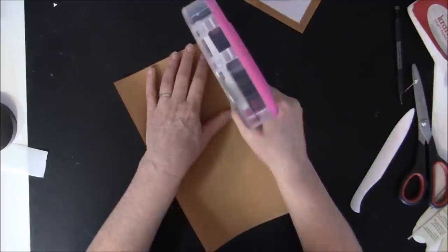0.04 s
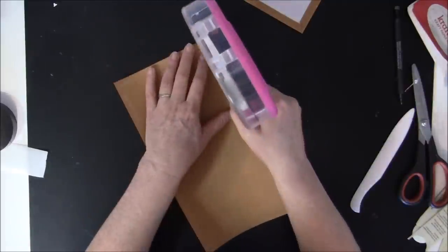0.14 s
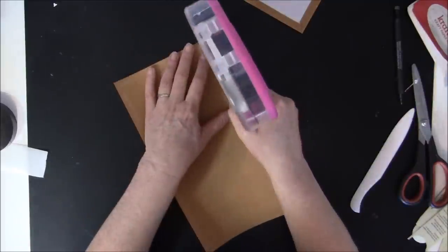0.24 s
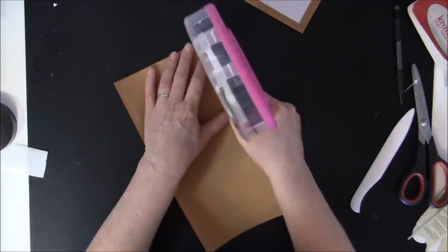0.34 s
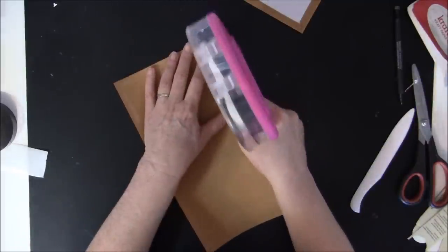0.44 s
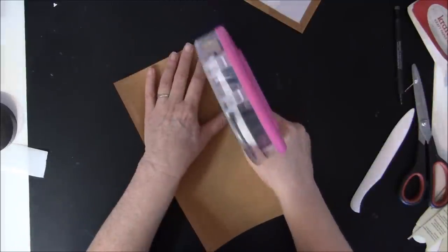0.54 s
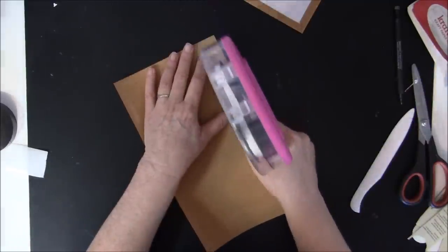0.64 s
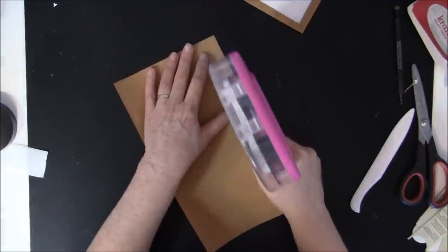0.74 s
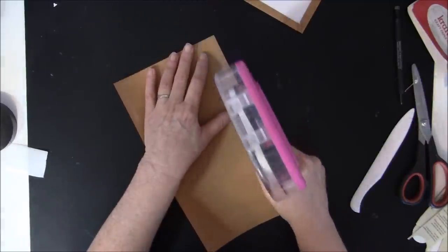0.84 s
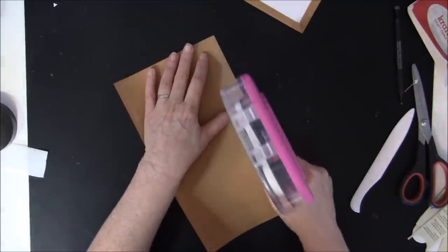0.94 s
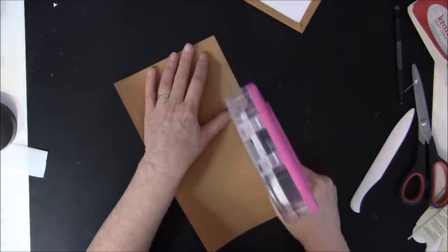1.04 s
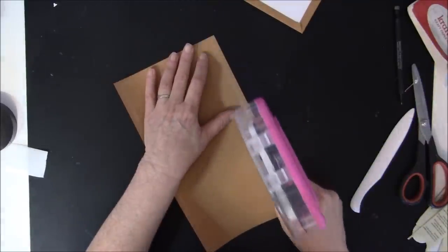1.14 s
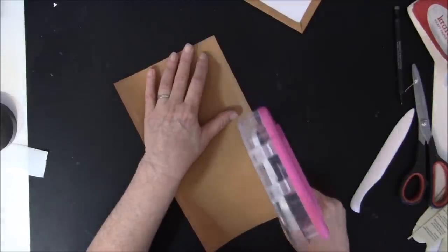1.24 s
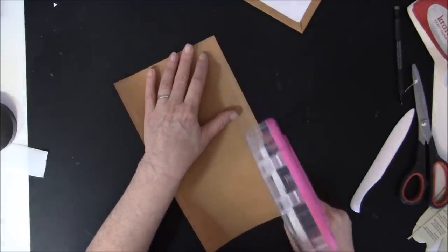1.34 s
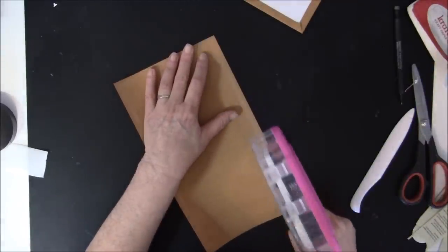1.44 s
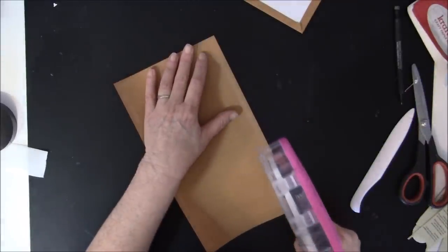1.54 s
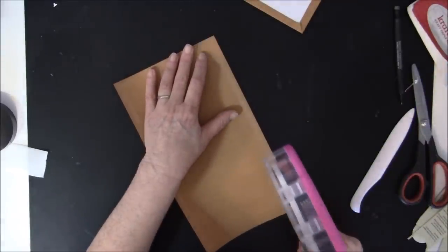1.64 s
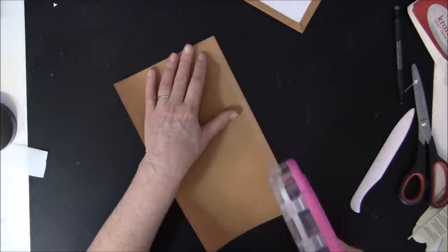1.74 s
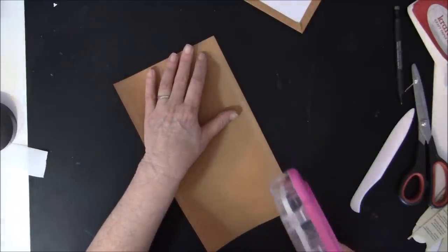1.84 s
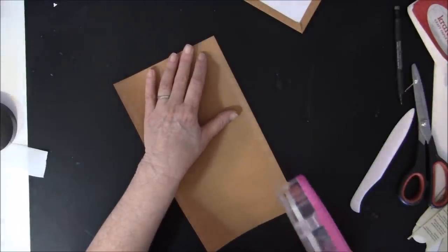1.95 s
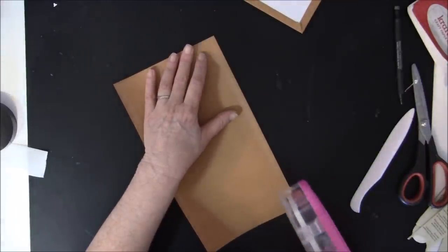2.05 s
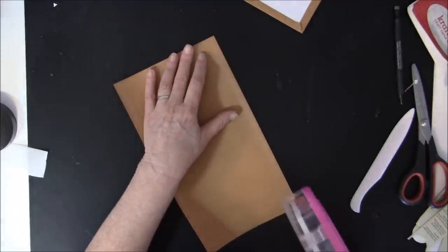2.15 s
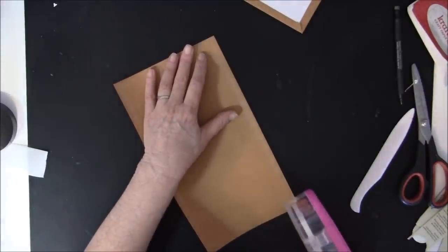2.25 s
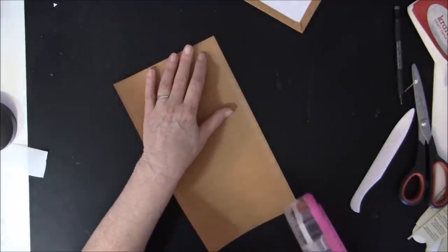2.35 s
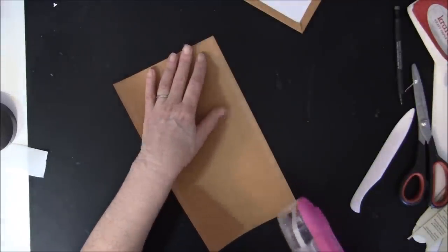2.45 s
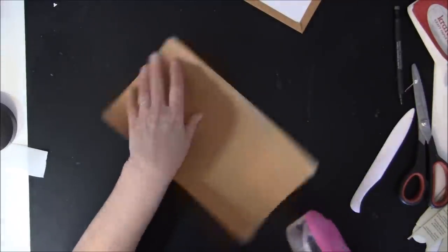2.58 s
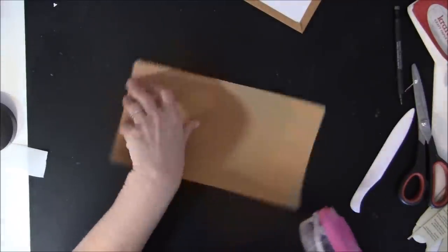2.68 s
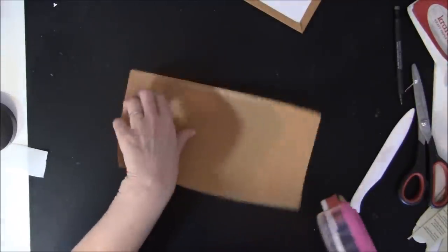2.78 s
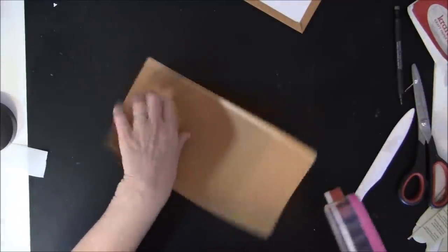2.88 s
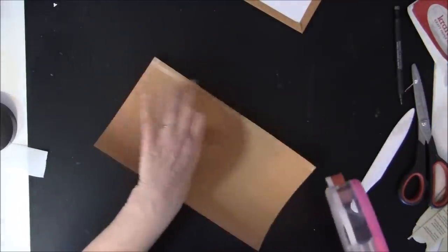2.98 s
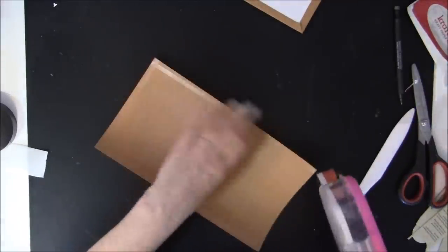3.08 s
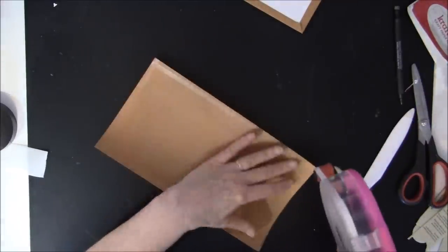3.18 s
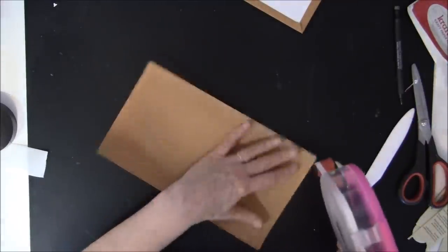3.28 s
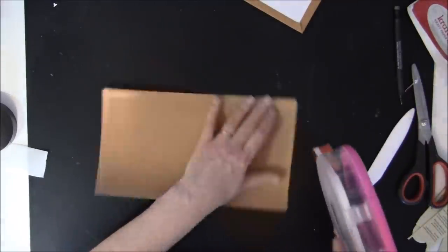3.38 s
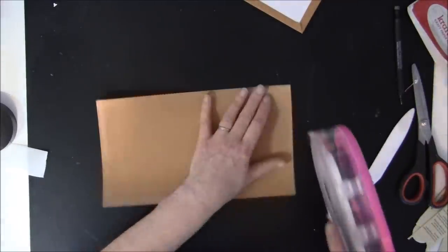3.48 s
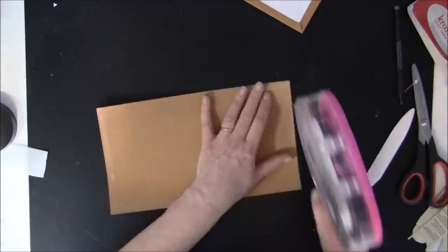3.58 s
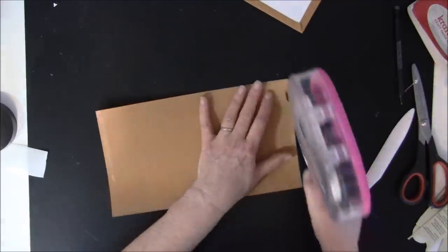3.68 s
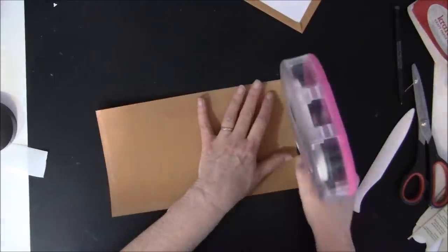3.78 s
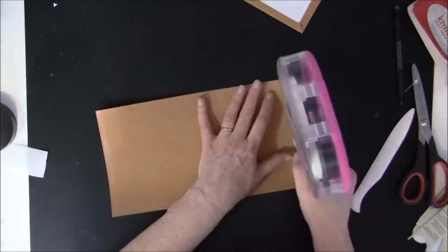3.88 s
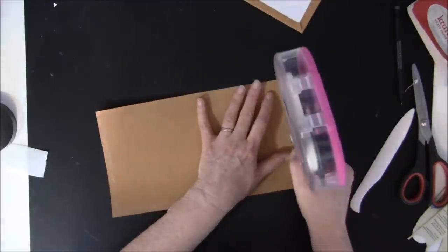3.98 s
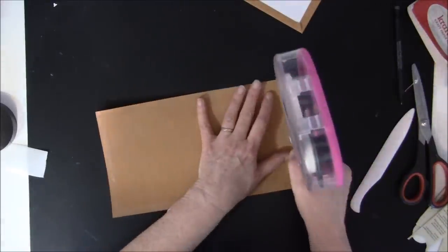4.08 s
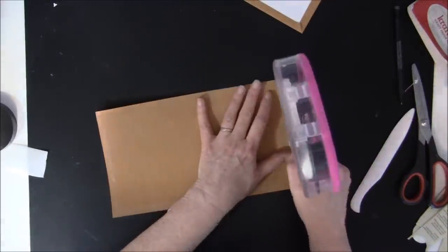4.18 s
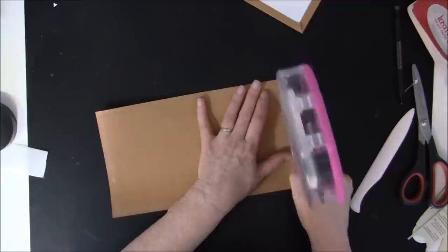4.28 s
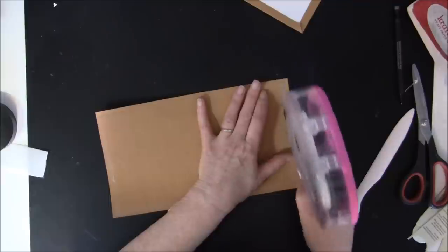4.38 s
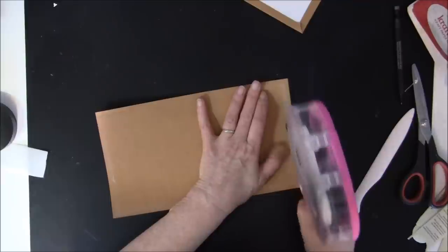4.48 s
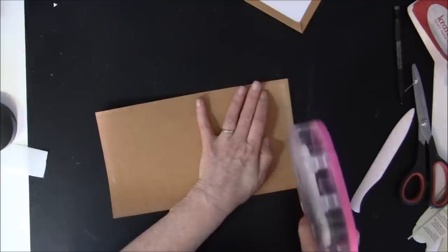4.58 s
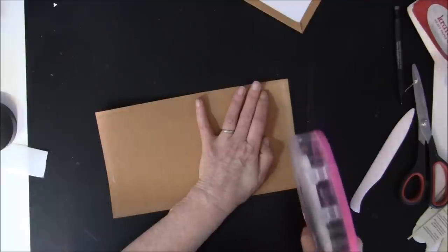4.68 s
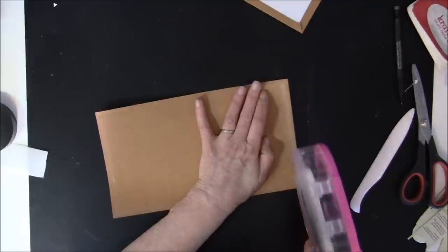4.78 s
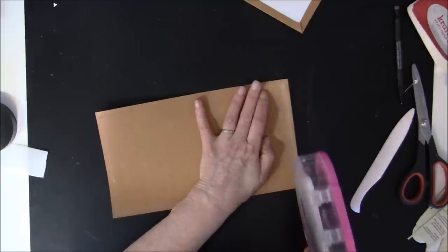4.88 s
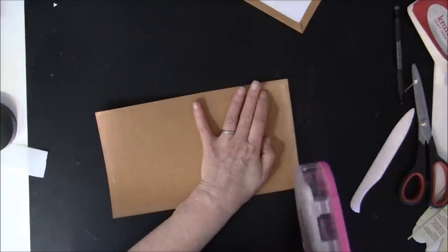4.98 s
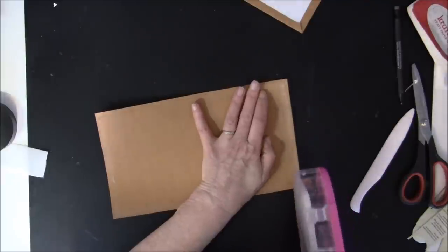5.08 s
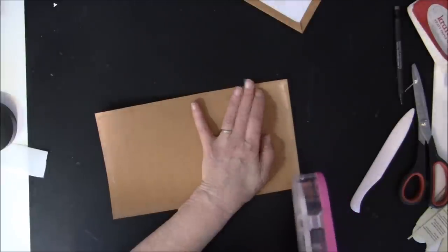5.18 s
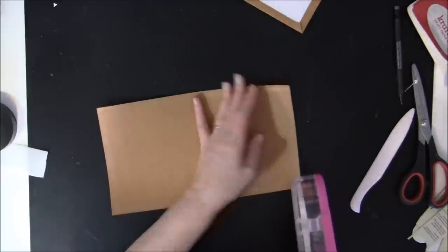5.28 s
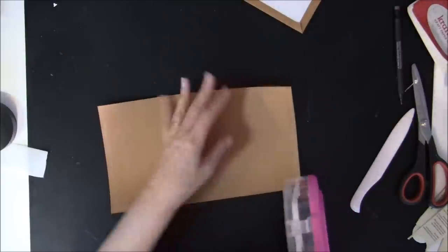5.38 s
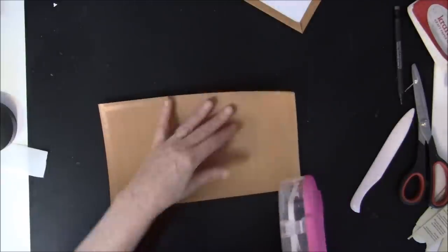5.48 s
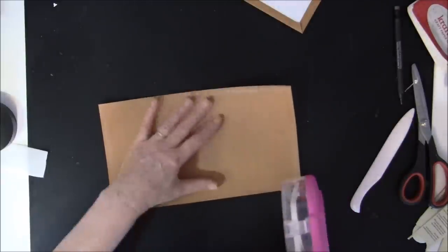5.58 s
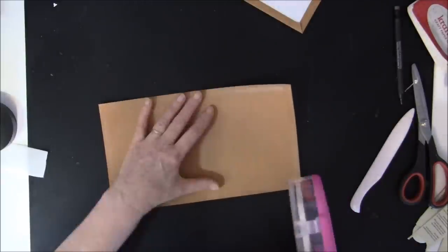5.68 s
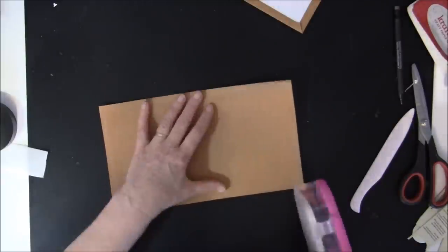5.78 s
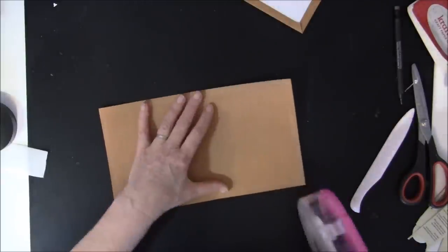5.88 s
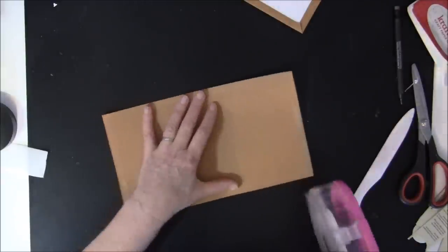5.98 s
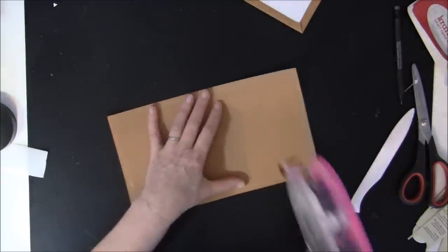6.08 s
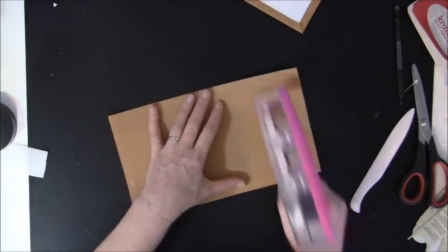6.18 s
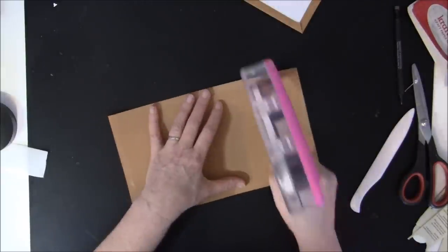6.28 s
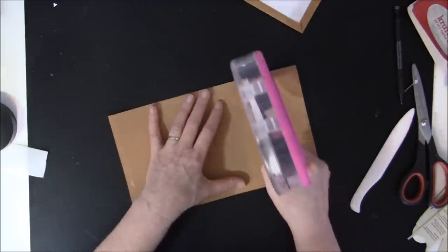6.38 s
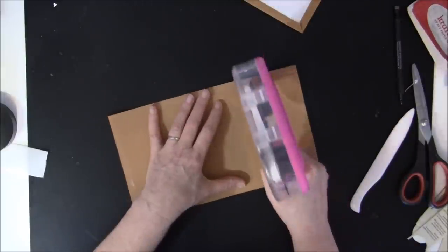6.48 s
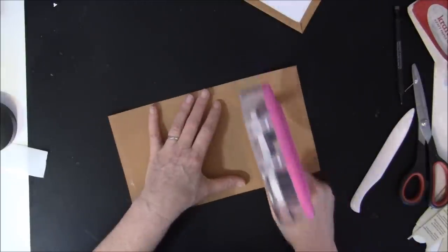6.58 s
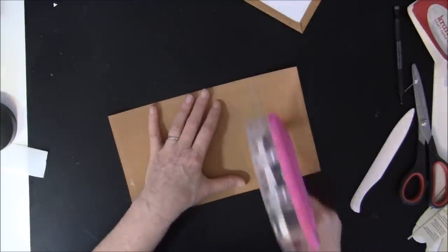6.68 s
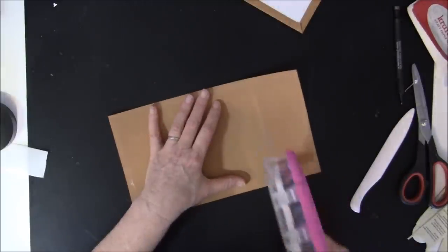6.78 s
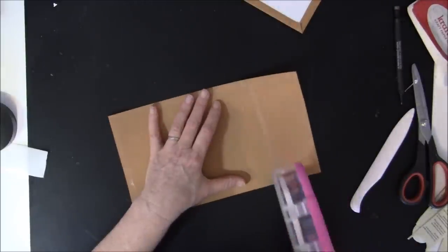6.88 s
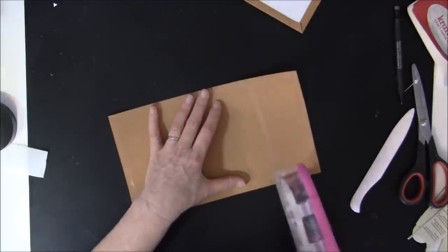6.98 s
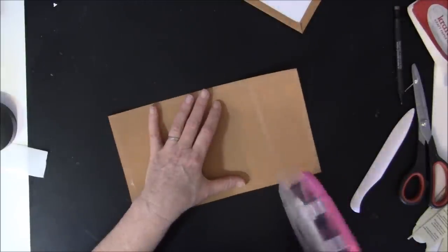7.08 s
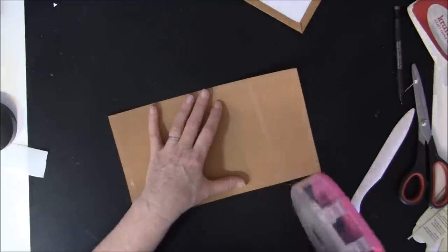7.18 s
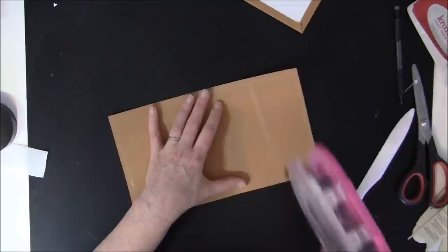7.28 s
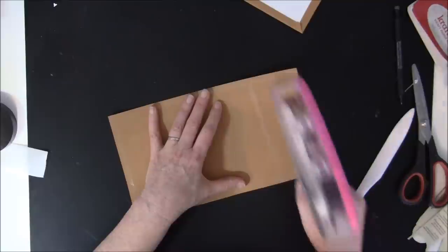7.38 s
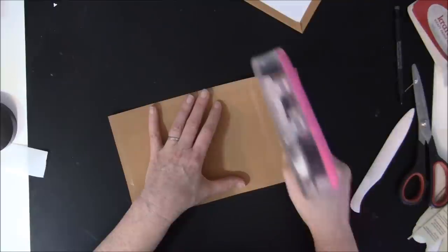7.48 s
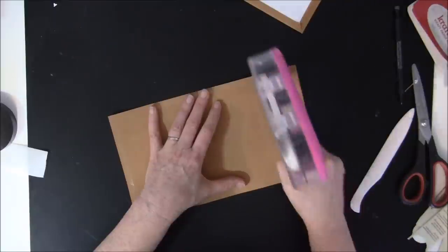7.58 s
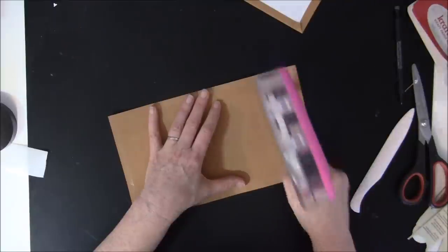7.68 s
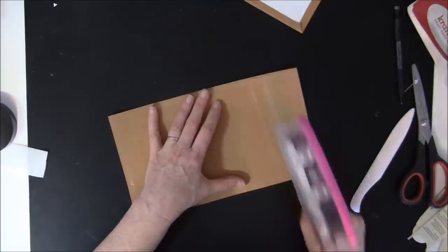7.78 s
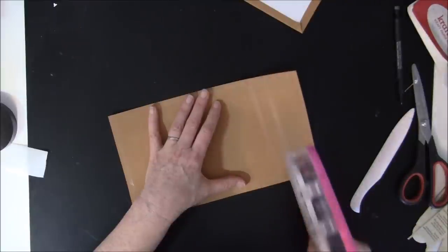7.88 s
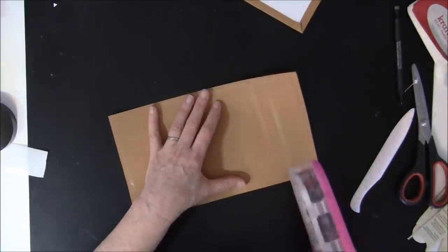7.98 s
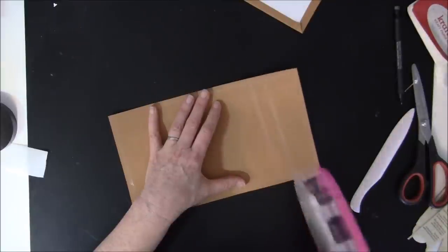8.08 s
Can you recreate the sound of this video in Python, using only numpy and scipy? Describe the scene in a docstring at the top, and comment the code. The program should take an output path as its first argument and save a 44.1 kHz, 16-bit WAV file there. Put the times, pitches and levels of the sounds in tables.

```python
"""At a craft table in a small room, a tape runner squeaks awake, then rolls a long, slow stroke over cardstock.
Its gears chatter in the hollow case while the tape rasps and crackles off; then the case clacks and a hand
slides and turns the card. Clacks, thuds and a squeak lead into a second stroke; more sliding follows.
Two short, loud strokes end it, the first with a burst of high squeaks, both set about with clacks and thuds.
Impacts and noise excite filters, squeaks and thuds are sines; air noise and a faint hum run throughout."""
import sys
import numpy as np
from scipy import signal
from scipy.fft import rfft, irfft
from scipy.io import wavfile
from scipy.ndimage import uniform_filter1d

SR = 44100
rng = np.random.default_rng(int(sys.argv[2]) if len(sys.argv) > 2 else 0)


def generate_wav(signal):
    """Clip the signal to [-1, 1] and save it as 16-bit WAV at the path in sys.argv[1]."""
    frames = np.transpose(np.atleast_2d(signal))
    scaled = np.clip(frames, -1, 1) * 32767
    pcm = np.round(scaled).astype(np.int16)
    wavfile.write(sys.argv[1], SR, pcm)


N = 358974
TIME = np.arange(N) / SR
BINS = np.fft.rfftfreq(4096, 1 / SR)  # filter design frequencies, Hz


# strokes of the runner: (start [s], fastest [s], end [s], relative gear chatter [dB], relative tape peel [dB],
# how much quieter at the ends [dB])
STROKES = [(0.318, 0.756, 2.18, -32.5, -50.5, 11), (4.2, 4.39, 5.106, -30.5, -45, 18),
           (6.5, 6.72, 6.92, -22, -37.5, 12), (7.607, 7.763, 8.08, -18.5, -32.5, 28)]


def rolling():
    """Pulling the runner turns its gears and strips its tape; chatter and peel surge with one uneven drag."""
    strokes = [swell(start, peak, end, ease_db) for start, peak, end, _, _, ease_db in STROKES]
    chatter_db, peel_db = np.transpose(STROKES)[3:5]
    drag = np.tanh(wander(rate_hz=5.7))
    return rolling_case(strokes, chatter_db, drag) + peeling_tape(strokes, peel_db, drag)


# broad response of the rolling case: (frequency [Hz], level [dB])
CASE_BROAD = [(40, -48), (150, -16), (400, -40), (1000, -19), (2500, -26), (3600, -24.5), (5000, -40),
              (16000, -48)]
# resonances of the rolling case: (frequency [Hz], width [Hz], level [dB])
CASE_MODES = [(346, 67, -15), (557, 42, 4), (643, 66, 3), (900, 31, -11.5), (1229, 57, 0), (1850, 180, -12),
              (2317, 33, -10.5), (2900, 78, -12.5)]
# resonances behind the small knocks of gear play: (frequency [Hz], width [Hz], level [dB])
KNOCK_MODES = [(580, 29, 0.5), (650, 42, -1.5)]
# spectrum of the roller skidding on the card: (frequency [Hz], level [dB])
SCRAPE = [(500, -27), (850, 1), (1500, 0), (3600, -9), (4700, -11.5), (6500, -30.5)]
TEETH_PER_S, TEETH_DB = 90, -18.5  # sharp ticks of the running teeth, within the chatter
SCRAPE_DB = -12.5  # within the chatter, at its loudest
KNOCKS_PER_S, KNOCKS_DB = 60, -4.5  # re the chatter level of a slow stroke
KNOCK_LIMIT_DB = -37  # the play is small, so knocks stop growing above this chatter level


def rolling_case(strokes, chatter_db, drag):
    """Meshing gears, sharp teeth and loose play ring the hollow case as the roller scrapes the card."""
    turning = level(strokes, chatter_db)
    meshing = slips(per_s=1300, spread_db=0.5) * gain_of(1.0 * drag)
    gears = flexed(colour(meshing, response(CASE_BROAD, CASE_MODES)))
    teeth = colour(beats(TEETH_PER_S, uneven=0.5, spread_db=9.0), struck_case())
    play = beats(KNOCKS_PER_S, uneven=0.6, spread_db=6)
    knocks = flexed(colour(play, response([(1000, -56)], KNOCK_MODES)))
    scrape = colour(slips(per_s=980, spread_db=4.5), response(SCRAPE))
    skid = turning / turning.max()  # the roller skids more the faster it is pulled
    chatter = gain_of(-2) * evened(gears) + gain_of(TEETH_DB) * evened(teeth)
    chatter += gain_of(SCRAPE_DB) * evened(scrape) * np.sqrt(skid)
    knocking = level(strokes, np.minimum(chatter_db, KNOCK_LIMIT_DB))
    return chatter * turning + gain_of(KNOCKS_DB) * evened(knocks) * knocking


# spectrum of adhesive letting go: (frequency [Hz], level [dB])
PEEL = [(2000, -39), (4000, -4.5), (6000, -8), (7500, -5.5), (9500, -2.5), (11500, -7.5), (13500, -14),
        (16000, -27)]
# spectrum of tape dragging over its guide: (frequency [Hz], level [dB])
RASP = [(1400, -22), (2100, -8), (2500, -4), (3000, -4), (3700, -2), (4400, -36), (8000, -55)]
SNAPS_PER_S, SNAPS_DB = 20, -17  # sparse snaps of adhesive, within the peel
RASP_DB = -51.5  # the same in every stroke


def peeling_tape(strokes, peel_db, drag):
    """Adhesive lets go in a dense crackle and sparse snaps while the tape rasps over its guide."""
    surge = gain_of(0.61 * drag + 3.5 * wander(rate_hz=31))
    crackle = colour(slips(per_s=3100, spread_db=-3.0) * surge, response(PEEL))
    snaps = colour(beats(SNAPS_PER_S, uneven=0.7, spread_db=0.0), response(PEEL))
    rasp = colour(slips(per_s=2500, spread_db=4.0), response(RASP))
    peel = gain_of(-5.5) * evened(crackle) + gain_of(SNAPS_DB) * evened(snaps)
    return peel * level(strokes, peel_db) + gain_of(RASP_DB) * evened(rasp) * np.sqrt(sum(strokes))


# dull knocks of the spool lurching in its case: (time [s], level [dB])
KNOCKS = [(0.554,-25), (0.645,-22), (0.755,-18.5), (0.917,-27.5), (1.421,-20.5), (1.781,-23), (2.228,-32),
          (4.338,-20.5), (4.42,-22.5), (4.547,-19), (4.596,-22.5), (4.653,-24), (4.807,-26), (6.765,-18.5),
          (7.76,-17), (7.842,-16.5)]
KNOCK_HZ, KNOCK_SCATTER, KNOCK_RISE_S = 606.7, 0.06, 0.0035  # each knock lands on another spot of the wall
KNOCK_OCTAVE_DB = -11.5  # the wall's second mode


def lurches():
    """The spool shifts in its play and knocks the hollow case: a short, soft, pitched bump."""
    out, t = np.zeros(N), TIME[:SR // 10]
    bump = (t / KNOCK_RISE_S * np.exp(1 - t / KNOCK_RISE_S)) ** 1.74
    spots = rng.uniform(-0.97, 1, len(KNOCKS))
    for (s, db), spot in zip(KNOCKS, spots):
        phase = 2 * np.pi * KNOCK_HZ * (1 + KNOCK_SCATTER * spot) * t
        tone = np.sin(phase) + gain_of(KNOCK_OCTAVE_DB) * np.sin(2 * phase)
        add(out, s, gain_of(db) * bump * tone)
    return out


# spool squeaks: (start [s], loudest [s], end [s], first pitch [Hz], last pitch [Hz], fundamental [dB],
# octave before the wall colours it [dB])
SQUEAKS = [(0.078, 0.088, 0.116, 740, 660, -31, -34), (0.275, 0.314, 0.348, 920, 1345, -29, -38),
           (4.16, 4.22, 4.248, 950, 1360, -26, -31.5), (6.467, 6.494, 6.503, 1160, 1350, -20.5, -37),
           (6.499, 6.508, 6.517, 2850, 2990, -14, -41), (6.509, 6.521, 6.533, 2950, 3150, -22, -25),
           (6.522, 6.536, 6.565, 3050, 3100, -33, -48)]
# how the case wall favours overtones gliding through its resonances: (frequency [Hz], level [dB])
SQUEAK_WALL = [(1950, -4), (2200, -3), (2520, 4.5), (2750, 2), (3500, 1), (4600, -11.5), (12000, -28)]
GLIDE_POWER = 2.3  # how soon the pitch settles
SQUEAK_EASE_DB, OVERTONE_EASE_DB = 19, 11  # how much quieter the ends are
OVERTONE_FALL_DB = 6  # per overtone above the octave
OVERTONE_LEAD = 0.65  # overtones peak at this share of the rise, while the slip is still harsh
SHUDDER_DB = 4  # greatest swing of the fundamental: the slip is uneven in strength


def squeaks():
    """The spool sticks and slips, its pitch gliding to rest; overtones flare as they cross wall resonances."""
    out, jitter = np.zeros(N), wander(rate_hz=410)
    shudder = gain_of(SHUDDER_DB * np.tanh(wander(rate_hz=99)))
    flutter = [gain_of(3.4 * wander(rate_hz=100)) for _ in range(5)]  # one per overtone
    for start, peak, end, first_hz, last_hz, first_db, octave_db in SQUEAKS:
        at = np.flatnonzero((TIME > start) & (TIME < end))
        hz = last_hz + (first_hz - last_hz) * np.linspace(1, 0, len(at)) ** GLIDE_POWER
        phase = 2 * np.pi * np.cumsum(hz * (1 + 0.032 * jitter[at])) / SR
        fundamental = gain_of(first_db) * swell(start, peak, end, SQUEAK_EASE_DB)[at] * shudder[at]
        tone = fundamental * np.sin(phase)
        overtone_peak = start + OVERTONE_LEAD * (peak - start)
        overtones = swell(start, overtone_peak, end, OVERTONE_EASE_DB)[at]
        for k, waver in enumerate(flutter, 2):
            wall = gain_of(octave_db - OVERTONE_FALL_DB * (k - 2) + read(SQUEAK_WALL, k * hz))
            tone += wall * overtones * waver[at] * np.sin(k * phase) * (k * hz < EDGE_HZ)
        add(out, start, np.sqrt(2) * tone * signal.windows.tukey(len(at), .1))
    return out


# broad response of the struck case: (frequency [Hz], level [dB])
CLACK_BROAD = [(60, -28), (230, -18), (390, -12), (1000, -7), (3000, -13.5), (4300, -16.5), (5500, -23),
               (9500, -25.5), (16000, -47.5)]
# resonances of the struck case: (frequency [Hz], width [Hz], level [dB])
CLACK_MODES = [(391, 48, -12.5), (535, 60, 6), (711, 26, 4.5), (1250, 134, -1), (1560, 160, -15),
               (1830, 200, -5), (2304, 60, -6.5), (2870, 490, -10)]


def struck_case():
    """Gain per bin of the plastic case when struck: wall resonances over a broad response."""
    return response(CLACK_BROAD, CLACK_MODES)


# clacks of the plastic case: (time [s], relative blow [dB], hollow body weight [dB], sharp edge weight [dB],
# rattle decay by 60 dB [s], ring of the struck wall [Hz], wall ring re case ring [dB])
CLACKS = [(2.395,-8.5,-2,-17,0.15,1567,-6), (2.526,-18.5,-11,-39,0.11,1170,-1.5),
          (2.761,-15,0,-5,0.05,387,-4), (3.654,-10.5,-3.5,-9,0.085,1938,-1),
          (4.018,-13,-0.5,-18.5,0.11,576,-8.5), (4.139,-16.5,1.5,-21,0.089,302,-4.5),
          (5.805,-13.5,-1.5,-13,0.13,325,-14), (5.912,-17,4.5,-40,0.11,1065,-10),
          (6.093,-10.5,-34,-21,0.12,2410,-14), (6.153,-18.5,-6,-29,0.065,1230,-5),
          (6.433,-5,-14,-15.5,0.13,1870,-23), (6.442,-13,11,-26,0.049,469,-13),
          (6.461,-7.5,-2,-34,0.16,1880,-7.5), (6.636,-10.5,-5,-22,0.12,302,-15),
          (7.301,-20.5,1,-23,0.32,1143,-4), (7.365,-20,-0.5,-30,0.079,1327,-5.5),
          (7.587,-8,-7.5,-15.5,0.12,2760,-11), (7.61,-9.5,0,-43,0.12,1700,-14),
          (7.976,-10,-1,-18,0.21,1260,-17)]
WALL_T60, WALL_RISE_S, WALL_PAIR = 0.059, 0.00064, 1.2  # decay s, rise s, upper tone's pitch re lower


def clacks():
    """Blows ring the case with their own mix of body and edge; the struck wall adds a close pair of tones."""
    out, t = np.zeros(N), TIME[:SR // 4] - TIME[SR // 100]  # contact comes 10 ms in
    case = struck_case()
    body, edge = 1 / (1 + (BINS / 900) ** 4), 1 - 1 / (1 + (BINS / 4300) ** 6)
    low, mid, high = (case * band / np.linalg.norm(case * band) for band in (body, 1 - body - edge, edge))
    after = np.maximum(t, 0)
    dying = (1 - np.exp(-after / WALL_RISE_S)) * np.exp(-np.log(1000) * after / WALL_T60)
    for s, db, body_db, edge_db, rattle_s, wall_hz, wall_db in CLACKS:
        # long rattles begin with a brief noise swell before the contact
        lead_in_db = np.interp(rattle_s, [.085, .12], [-20, 2])
        blow = contact(t, rattle_s, rattle=2.3, lead_in_db=lead_in_db)
        ring = colour(blow, gain_of(body_db) * low + 0.72 * mid + gain_of(edge_db) * high)
        pair = sum(np.sin(2 * np.pi * (hz * t + rng.random())) for hz in (wall_hz, WALL_PAIR * wall_hz))
        add(out, s + t[0], gain_of(db) * (evened(ring) + gain_of(wall_db) * evened(dying * pair)))
    return gain_of(-20.5) * out


# small clicks of the gear teeth catching: (time [s], relative level [dB])
CATCHES = [(0.083,-26.5), (0.237,-30.5), (0.644,-23), (0.799,-20.5), (1.503,-18.5), (2.24,-33),
           (2.352,-27.5), (4.711,-19), (5.727,-22), (5.745,-19.5), (5.773,-22), (6.695,-16), (6.809,-16.5),
           (6.858,-14.5), (6.945,-18.5), (7.031,-25), (7.322,-22.5), (7.724,-20), (7.818,-10.5)]
CATCH_RATTLE_S, CATCH_EDGE_DB = 0.071, -3.5  # decay of a tooth's chatter; its treble re that of the struck case


def catches():
    """A gear tooth catches and lets go with a brief click in the case."""
    out, t = np.zeros(N), TIME[:SR // 4]
    treble = (BINS / 4300) ** 6 / (1 + (BINS / 4300) ** 6)
    case = struck_case() * gain_of(CATCH_EDGE_DB * treble)
    for s, db in CATCHES:
        click = colour(contact(t, CATCH_RATTLE_S, rattle=3.3), case)
        add(out, s, gain_of(db) * evened(click))
    return gain_of(-20.5) * out


# thuds on the table: (time [s], relative level [dB])
THUDS = [(0.09, -44), (4.02, -24), (4.14, -23.5), (4.559, -31.5), (4.657, -39), (5.565, -37), (5.8, -34.5),
         (6.434, -14.5), (6.466, -21), (6.643, -28), (7.59, -18.5)]
# modes of the table top: (frequency [Hz], level [dB], decay by 60 dB [s])
TABLE_MODES = [(73.3, -6.5, 0.26), (106.5, 0.5, 0.081), (171.3, -6.5, 0.17), (192, -5, 0.08)]


def thuds():
    """Pressing the runner down sets the table top swinging; it radiates little below its lowest mode."""
    out, t = np.zeros(N), TIME[:SR // 2]
    swing = sum(gain_of(db - 60 * t / t60) * np.sin(2 * np.pi * hz * t) for hz, db, t60 in TABLE_MODES)
    soft_onset = 1 - np.exp(-t / 0.0036)
    for s, db in THUDS:
        add(out, s, gain_of(db) * swing * soft_onset)
    return gain_of(5) * signal.sosfilt(signal.butter(4, 58, "high", fs=SR, output="sos"), out)


# swishes of card and hand: (start [s], peak [s], end [s], relative hiss [dB], relative dull rub [dB])
SLIDES = [(2.434, 2.505, 2.63, -31.5, -36), (2.54, 2.63, 2.77, -23, -35.5),
          (2.663, 2.692, 2.73, -19.5, -33), (2.7, 2.727, 2.88, -39, -31), (2.795, 2.823, 2.89, -25, -34),
          (2.815, 2.894, 2.936, -19.5, -29), (3.015, 3.056, 3.08, -39, -39), (3.189, 3.39, 3.602, -26, -34),
          (3.316, 3.355, 3.472, -15, -58), (4.423, 4.528, 4.47, -34, -49), (5.25, 5.277, 5.35, -39, -38.5),
          (5.327, 5.404, 5.5, -32.5, -40.5), (5.424, 5.507, 5.8, -43.5, -41.5),
          (5.566, 5.648, 5.64, -30.5, -55), (5.705, 5.785, 5.85, -43.5, -43),
          (5.91, 6.009, 6.19, -32.5, -36)]
# spectrum of the fine hiss of paper fibres: (frequency [Hz], level [dB])
HISS = [(900, -40), (2000, -20), (3000, -6.5), (4300, -3.5), (9300, 2.5), (12500, -5), (15500, -22)]
# spectrum of the duller rub of the sheet: (frequency [Hz], level [dB])
RUB = [(80, -26), (300, -12), (600, -13), (900, -3), (1200, -0.5), (1900, 3.5), (2800, 3.5), (4500, 0.5),
       (9000, -55)]
SLIDE_EASE_DB = 26.5  # how much quieter a swish is at its ends


def sliding():
    """Paper fibres catch on the mat and on skin: a fine hiss and the duller rub of the sheet."""
    swishes = [swell(start, peak, end, SLIDE_EASE_DB) for start, peak, end, _, _ in SLIDES]
    hissing, rubbing = (level(swishes, column) for column in np.transpose(SLIDES)[3:])
    grip = gain_of(1.0 * wander(rate_hz=120))
    hiss = evened(colour(slips(per_s=13000, spread_db=1.0), response(HISS)))
    rub = evened(colour(slips(per_s=3800, spread_db=2.0), response(RUB)))
    return grip * (gain_of(-2.5) * hiss * hissing + gain_of(2.0) * rub * rubbing)


# light ticks of card and tape: (time [s], peak level [dB])
TICKS = [(0.694,-27), (1.077,-25), (1.188,-31), (1.284,-32.5), (2.457,-9.5), (2.738,-8.5), (2.938,-15.5),
         (2.984,-33), (3.224,-18), (5.204,-17), (5.226,-18), (5.536,-15), (5.557,-16.5), (8.036,-19.5)]


def ticks():
    """Light ticks: adhesive snaps as tape pulls, fingertips and card edges flick."""
    out, t = np.zeros(N), TIME[:SR // 10]
    card = response(HISS) + response(RUB)
    for s, db in TICKS:
        tick = colour(contact(t, rattle_s=0.045, rattle=1.63), card)
        add(out, s, gain_of(db) * tick / abs(tick).max())
    return out


# spectrum of the room tone: (frequency [Hz], level [dB])
QUIET = [(25,-23), (70,-1), (100,-13), (130,-4), (280,1), (590,1.5), (1000,-2.5), (4000,-14.5),
         (15500,-28.5)]
# room tone, unlike part re shared part: (frequency [Hz], level [dB])
AIR_SIDE = [(60, -8), (110, -4), (250, 5.5), (500, 5), (8000, -3)]
AIR_DB = -47  # shared part, rms
HUM_HZ, HUM_DB = 99.6, -57.5  # rms


def room_tone():
    """Steady air noise, wide in the middle range and centred in the bass, and a faint mains hum."""
    shared, unlike = (evened(colour(rng.standard_normal(N), response(QUIET))) for _ in range(2))
    unlike = colour(unlike, response(AIR_SIDE))
    air = gain_of(AIR_DB) * np.array([shared + unlike, shared - unlike])
    return air + gain_of(HUM_DB) * np.sqrt(2) * np.sin(2 * np.pi * HUM_HZ * TIME)


# shared reflections re direct sound: (frequency [Hz], level [dB])
ROOM_DB = [(70, -56), (150, -22.5), (350, -3), (2000, -11), (9000, -10)]
# reflections, unlike part re shared part: (frequency [Hz], level [dB])
ROOM_SIDE = [(600, -13), (2000, -4), (11000, 3.5)]
ROOM_T60 = 0.16  # s


def room(x):
    """Adds a short scatter of reflections, alike at both ports in the bass and unlike in the treble."""
    t = TIME[:SR // 2]
    arrivals = rng.choice([-1, 1], (2, len(t))) * (rng.random((2, len(t))) < 3000 / SR)
    taps = arrivals * gain_of(-60 * t / ROOM_T60)
    shared, unlike = (colour(part / np.linalg.norm(part), response(ROOM_DB)) for part in taps)
    unlike = colour(unlike, response(ROOM_SIDE))
    echoes = np.array([shared + unlike, shared - unlike])
    return x + signal.fftconvolve(x[None], echoes, axes=1)[:, :N]


STOP_S = 0.011  # a movement fades to nothing this fast outside its span


def swell(start, peak, end, ease_db):
    """Gain of one hand movement, gathering speed to the peak and easing off: a rounded arch in dB."""
    away = np.interp(TIME, [start, peak, end], [1, 0, 1])
    inside = np.clip(np.minimum(TIME - start, end - TIME) / STOP_S + 1, 0, 1)
    return inside * gain_of(-ease_db * away ** 2)


def level(gestures, gains_db):
    """Gain over time of several movements, each at its own level, summed as powers."""
    return np.sqrt(sum((gain_of(db) * gesture) ** 2 for gesture, db in zip(gestures, gains_db)))


def contact(t, rattle_s, rattle, lead_in_db=0):
    """Sharp contact at t = 0, then a dying rattle of loose parts; any t < 0 holds a short rising noise."""
    fall_db = np.where(t < 0, lead_in_db + 2200 * t, -60 * t / max(rattle_s, .005))
    bounces = evened(uniform_filter1d(rng.standard_normal(len(t)), size=60))
    tail = rng.standard_normal(len(t)) * gain_of(fall_db + 2.45 * bounces)
    return (t == 0) + rattle * tail / np.linalg.norm(tail)


def slips(per_s, spread_db):
    """Tiny random impacts; positive spread makes a few stand out, negative makes a few fainter."""
    size = gain_of(spread_db * np.minimum(rng.exponential(1, N), 4))
    return size * rng.choice([-1, 1], N) * (rng.random(N) < per_s / SR)


def beats(per_s, uneven, spread_db):
    """Loosely regular impacts, their sizes spread in dB."""
    rate = per_s * np.exp(uneven * wander(rate_hz=per_s))
    turns = np.floor(np.cumsum(rate) / SR)
    return np.diff(turns, prepend=0) * gain_of(spread_db * rng.uniform(-0.85, 1, N))


def wander(rate_hz):
    """Smooth random motion of rms 1, up to about the given rate."""
    rolloff = 1 + (np.fft.rfftfreq(N, 1 / SR) / rate_hz) ** 4
    return evened(irfft(rfft(rng.standard_normal(N)) / rolloff, N))


FLEX, FLEX_HZ = 0.035, 14  # the grip bends the case: rms share and rate of the drift of its resonances


def flexed(x):
    """Lets the resonances of a steady sound drift up and down together by wavering its playing speed."""
    place = np.cumsum(1 + FLEX * wander(rate_hz=FLEX_HZ))
    return np.interp(place % N, np.arange(N), x)


def response(broad, modes=()):
    """Gain per bin: a broad spectrum with resonance peaks on it."""
    peaks = sum(gain_of(db) ** 2 / (1 + ((BINS - hz) / width) ** 2) ** 2 for hz, width, db in modes)
    return np.sqrt(gain_of(read(broad, BINS)) ** 2 + peaks)


def colour(x, gain):
    """Passes x through the causal minimum-phase filter that has this gain per bin."""
    log_gain = np.log(np.r_[gain, gain[-2:0:-1]] + 1e-6)
    taps = np.fft.ifft(np.exp(np.conj(signal.hilbert(log_gain)))).real
    return signal.oaconvolve(x, taps)[:len(x)]


def gain_of(db):
    """Decibels to amplitude."""
    return 10 ** (np.asarray(db) / 20)


def evened(x):
    """Scales to rms 1."""
    return x / np.sqrt(np.mean(x ** 2) + 1e-20)


def read(points, hz):
    """Reads a spectrum on a log-frequency axis."""
    f, value = np.transpose(points)
    return np.interp(np.log(hz + 1), np.log(f + 1), value)


def add(mix, s, sound):
    """Mixes a sound in at time s."""
    part = mix[max(round(s * SR), 0):][:len(sound)]
    part += sound[:len(part)]


def scene():
    """Everything on the table, heard in the room."""
    runner = rolling() + lurches() + squeaks() + clacks() + catches()
    table_and_card = thuds() + sliding() + ticks()
    return room(runner + table_and_card) + room_tone()


# left minus right port: (frequency [Hz], level [dB])
BALANCE = [(220, 0), (680, -2.3), (1400, -.1), (8000, -.6), (13000, 2.4)]
# phase by which the left port leads: (frequency [Hz], phase [radians])
LEAD = [(100, 0), (1000, .15), (9500, .2), (13000, 2.2)]
EDGE_HZ = 15850  # upper band limit


def record(dry):
    """Two close microphone ports differ in level and phase; high peaks are rounded off, then band-limited."""
    hz = np.fft.rfftfreq(N, 1 / SR)
    side = np.array([[.5], [-.5]])
    tilt = gain_of(side * read(BALANCE, hz)) * np.exp(1j * side * read(LEAD, hz))
    ports = irfft(rfft(dry) * tilt, N)
    rounded = ports / (1 + (ports / .85) ** 6) ** (1 / 6)
    lowpass = signal.firwin(511, EDGE_HZ, window=("kaiser", 9), fs=SR)
    return signal.oaconvolve(rounded, lowpass[None], "same")


dry = scene()
out = record(dry)
generate_wav(out)
```